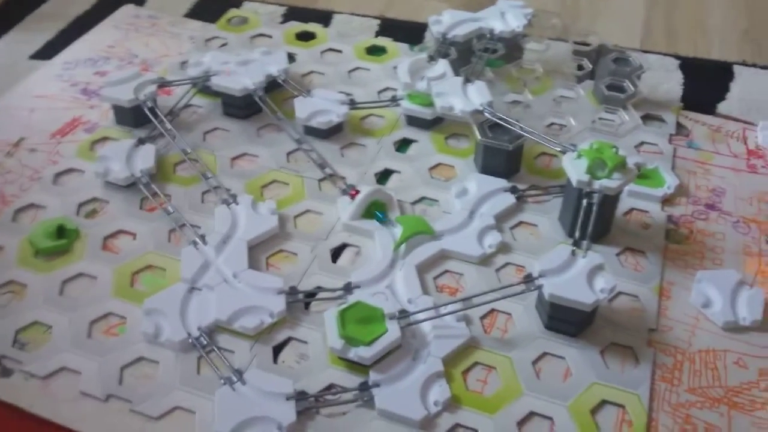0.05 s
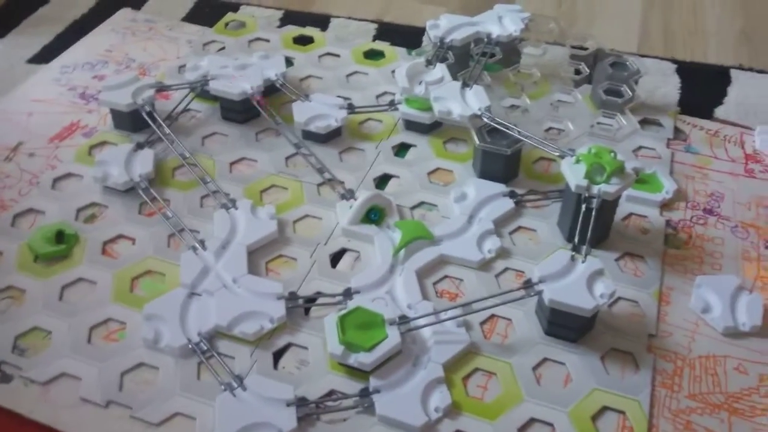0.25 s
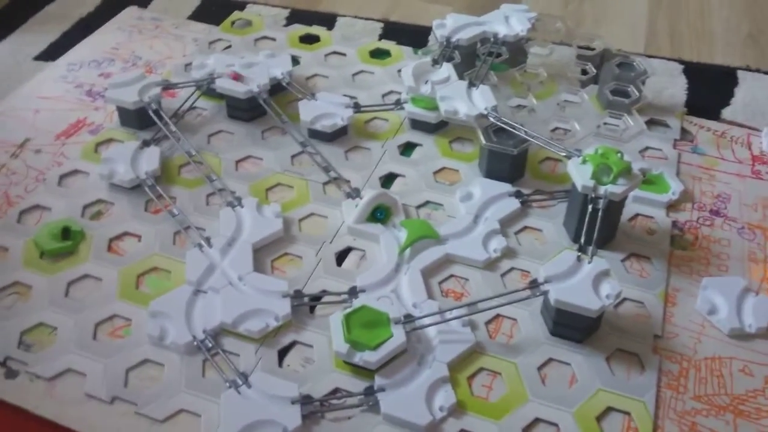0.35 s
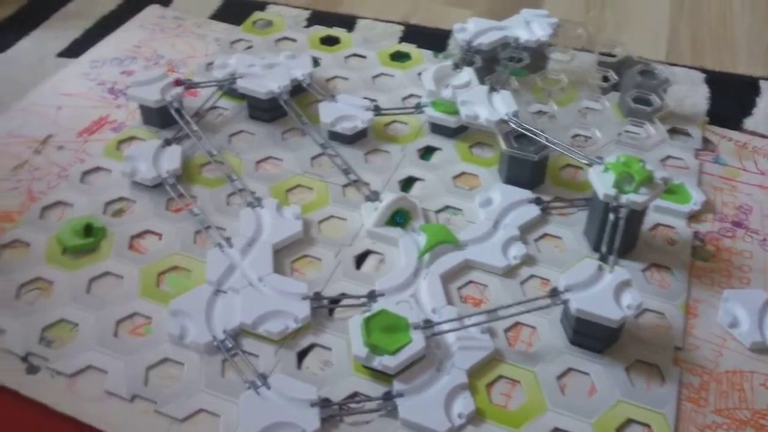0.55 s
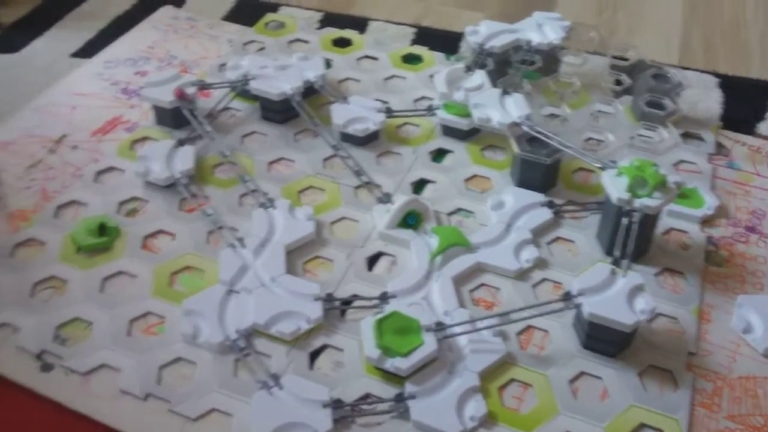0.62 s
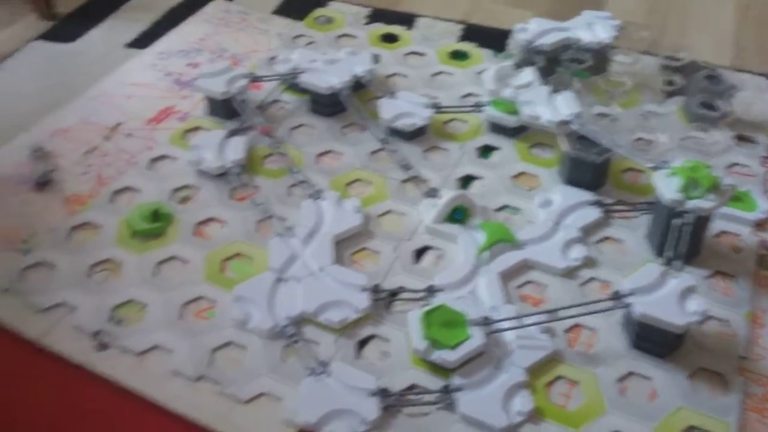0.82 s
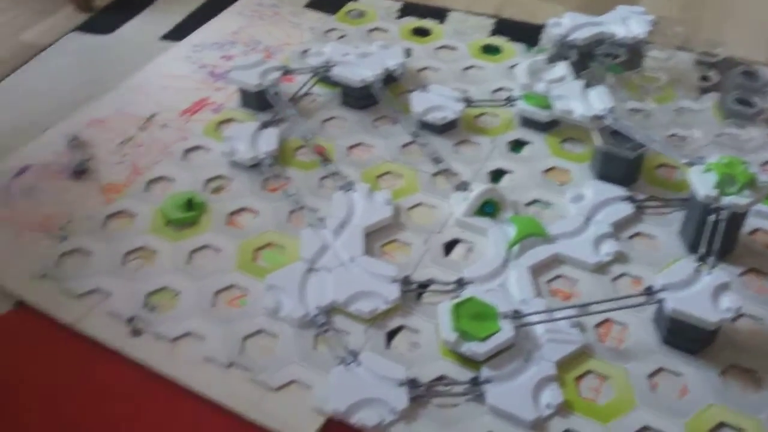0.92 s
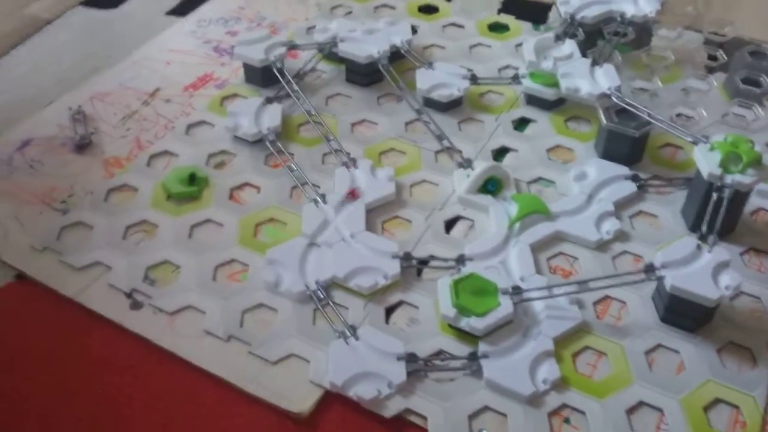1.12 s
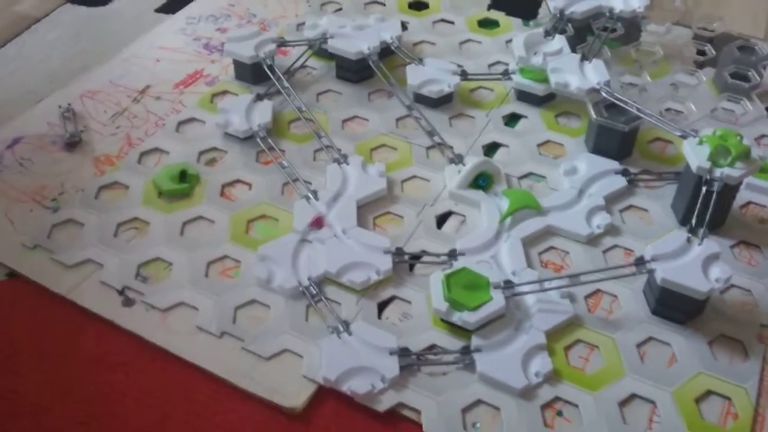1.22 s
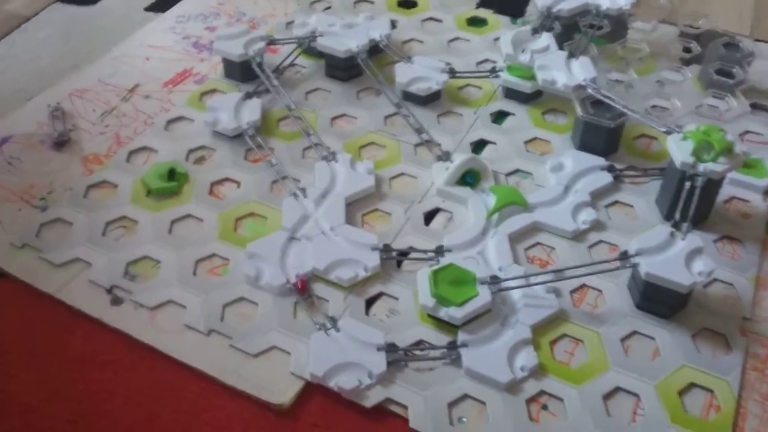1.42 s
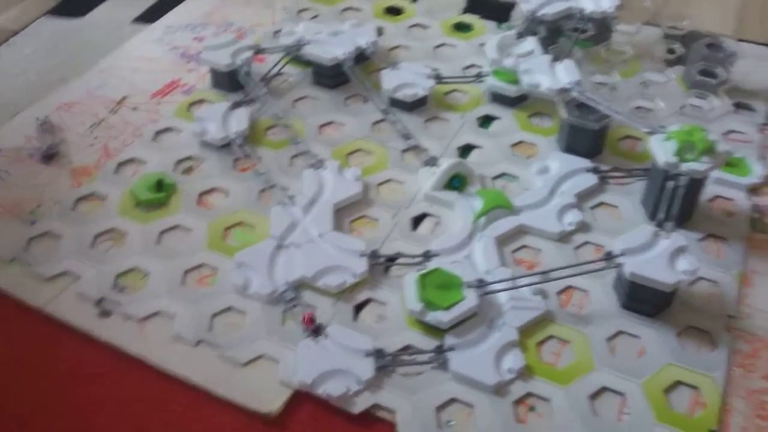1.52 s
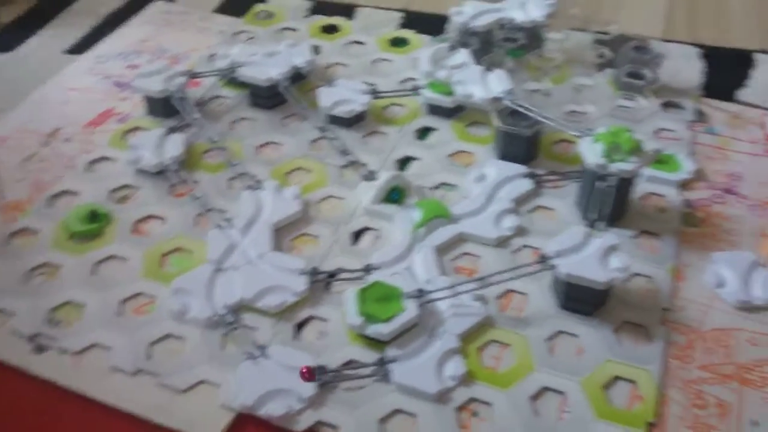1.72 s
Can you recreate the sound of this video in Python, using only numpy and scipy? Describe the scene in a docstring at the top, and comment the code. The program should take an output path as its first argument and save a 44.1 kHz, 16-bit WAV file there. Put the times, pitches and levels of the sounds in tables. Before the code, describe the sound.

Marbles roll along a plastic toy track with a light rumble and small clicks. At about 0.2 seconds two marbles collide with a sharp, bright clack. Irregular clicks and a thin whirr on steel rails continue until 0.9 seconds. After a brief lull, clicking resumes at 1.1 seconds, then quick plastic knocks, loudest near 1.4 seconds, ease off by 1.7. The small room adds a short reverberation and faint steady noise.

```python
"""Marbles on a toy track

Marbles run over plastic tiles and steel rails on a cardboard base, in a small room. Rolling is a train
of tiny impacts, under which the tiles rumble and the rails sing. Larger impacts excite damped vibration:
clicks at the joints, knocks on the walls of curved tiles and, once, the hard clack of two marbles.
The room reverberates after each contact, over a faint steady noise."""
import sys
import numpy as np
from scipy import signal
from scipy.fft import rfft, irfft
from scipy.io import wavfile
from scipy.ndimage import map_coordinates

SR = 44100
rng = np.random.default_rng(int(sys.argv[2]) if len(sys.argv) > 2 else 0)


def dump_mix(stems):
    """Bounce the given channels to the path in sys.argv[1] as a 16-bit WAV at rate SR."""
    frames = np.atleast_2d(stems).T  # one column per channel
    limited = np.clip(frames, -1, 1)  # hard clip at full scale
    pcm = np.round(limited * 32767).astype(np.int16)
    wavfile.write(sys.argv[1], SR, pcm)


N = 77175

# Impacts at joints or walls; each trim adds to the level set below for that part:
# t/s, level/dB, knock trim/dB, rail trim/dB, rail tilt/(dB/octave), snap trim/dB, reverberation/dB
JOINT_IMPACTS = [(0.2134, -23, -38, -7, -25, -23, 9.5), (0.3874, -29, -10, 11, -36, -13.5, 4.5),
                 (0.4186, -24, -6.5, -10.5, -23, -15.5, -5), (0.4298, -29.5, -5, -22, -25, -10.5, 1),
                 (0.4485, -32.5, -7.5, 14.5, -37, -13, 0), (0.526, -28.5, -11.5, -2, -35, -18.5, 0.5),
                 (0.6271, -36, -33, 6.5, -35, -13, 1.5), (0.6774, -27.5, -3, 3, -15, -19, 2.5),
                 (0.7723, -35.5, -18, -3, -19, -16, 2), (0.797, -31.5, -41, 8, 5, -13.5, 3.5),
                 (0.8324, -28.5, -13, 2, 10, -13.5, -6.5), (0.8406, -30.5, -13, 1.5, -1, -11.5, -10.5),
                 (1.0846, -43, -10, 12.5, 3.5, -30, -0.5), (1.1324, -38, -12, 7, -22.5, -7, 0),
                 (1.1392, -30.5, -29, 2, 7, -25, 0), (1.1665, -34, -2.5, 7.5, 2, -10.5, 6.5),
                 (1.1716, -29.5, -6.5, 8.5, -17, -11, 1.5)]
# Impacts on curved tiles: t/s, level/dB, shell trim/dB, edge trim/dB, upper wall resonance f/Hz
WALL_IMPACTS = [(0.017, -33, -22, 0.5, 2540), (0.0844, -27, -10, -1.5, 2560),
                (.125, -26, -12.5, -7.5, 2230), (0.5013, -25, -18, -12, 1890),
                (1.1709, -23.5, -2.5, -3.5, 3700), (1.2784, -19, -8, -11, 3380),
                (1.2961, -22, -6.5, -22, 3500), (1.31, -33, -19, -10, 3550), (1.3636, -24.5, -7, -35, 1880),
                (1.421, -17.5, -7.5, -9.5, 2250), (1.4278, -15, -6.5, -16, 2780),
                (1.4344, -32.5, 7, 6.5, 2680), (1.459, -22, 1, -6.5, 2900), (1.536, -33, 1.5, 2.5, 2900),
                (1.587, -30, -9.5, 0, 3060), (1.6475, -38.5, -2.5, 3.5, 3100),
                (1.712, -32.5, -5, -5.5, 2980)]
# Impacts of marble on marble: t/s, level/dB
MARBLE_IMPACTS = [(0.2189, -17.5), (0.2199, -25)]

# Envelopes of the rolling sounds: t/s, level/dB
RUMBLE_ENVELOPE = [(0, -36.5), (.075, -51), (.1, -43.5), (.185, -46), (.23, -37), (.36, -62), (.43, -65),
                   (.52, -47), (.62, -60.5), (.73, -49.5), (.79, -48), (.92, -70.5), (1.14, -73),
                   (1.22, -44), (1.35, -42.5), (1.41, -53), (1.47, -50), (1.52, -42.5), (1.58, -60.5),
                   (1.68, -57.5), (1.75, -52.5)]
WHIRR_ENVELOPE = [(0, -35), (.07, -72), (.13, -45.5), (.19, -59), (.37, -68), (.44, -38.5), (.51, -55),
                  (.55, -45), (.61, -51), (.66, -42), (.75, -64), (.84, -42), (.93, -67.5), (1.12, -63),
                  (1.22, -63), (1.4, -53.5), (1.5, -47.5), (1.75, -61.5)]
SING_ENVELOPE = [(.3, -72), (.47, -63), (.7, -62), (.83, -56), (.94, -66), (.98, -63), (1, -68),
                 (1.02, -61), (1.12, -64), (1.4, -76)]

# Spectral shapes: f/Hz, level/dB
PLASTIC_SPECTRUM = [(500, -25.5), (1300, -18.5), (2000, 1), (2900, 0), (3700, 1), (4600, 1.5), (5500, 3),
                    (6600, 1.5), (7200, -7), (8000, -16.5), (16000, -49)]
BASE_SPECTRUM = [(40, -40), (75, -14), (130, -6), (200, -6), (295, 3.5), (400, -1), (510, -14), (720, 0),
                 (1000, 2), (2300, -4), (4000, -50)]
SNAP_SPECTRUM = [(4000, -6), (7000, -17), (8500, -15), (9700, -10), (11200, -4.5), (13000, -12),
                 (15500, -11), (17000, -17.5)]
MARBLE_SPECTRUM = [(40, -43.5), (110, -23.5), (260, -2.5), (480, -34), (950, -11), (1700, -1), (2400, -18),
                   (4100, -3), (5400, 5.5), (6900, 7.5), (7800, -8.5), (9500, -4), (11300, -0.5),
                   (13000, 4.5), (15400, 6), (16300, -14.5)]
RUMBLE_SPECTRUM = [(40, -36), (120, -7), (190, -6), (290, 3), (400, -2), (520, -11), (690, -1), (830, -3),
                   (990, 1.5), (1300, -4), (1540, 5), (1690, -2), (1850, 1), (2900, -10), (4600, -17),
                   (6300, -13), (7800, -35), (16000, -46)]
WHIRR_SPECTRUM = [(300, -3), (1300, -7.5), (2000, 9.5), (3600, -1), (5300, 10.5), (6600, 11.5), (7200, -2),
                  (8000, -27), (16000, -27)]
AMBIENT_SPECTRUM = [(20, -10), (45, -22), (75, 5), (130, 5), (500, -5.5), (3000, -5.5), (6500, -14),
                    (8000, -26), (16000, -14.5)]

# Normal modes of the rails and of the ring after a collision: f/Hz, level/dB, T60/s
STEEL_RAIL_MODES = [(1710, 0, .07), (1790, -3, .05), (2050, -5, .028), (3850, 5, .022), (4060, 2, .022),
                    (4980, -1, .02)]
COLLISION_MODES = [(1695, -7, .15), (5380, -7, .13), (6135, -5, .16), (6210, -5, .16), (11280, -9, .11),
                   (12455, -2, .09), (13130, -7, .09), (15225, -2, .085)]
# Resonances of a hollow tile's shell: f/Hz, bandwidth/Hz, level/dB
SHELL_RESONANCES = [(378, 165, -7), (728, 150, 3.5), (1035, 163, 5.5)]
# Reverberation time of the room: f/Hz, T60/s
ROOM_DECAY = [(100, 0.12), (500, 0.38), (2000, 0.25), (6000, 0.29), (10000, 0.21), (16000, 0.21)]

CLICK_T60_S, KNOCK_T60_S, SNAP_T60_S, CLACK_T60_S, WALL_T60_S = 0.044, 0.038, 0.0086, 0.014, 0.016
CLICK_DB, KNOCK_DB, SNAP_DB, RAIL_DB = -9, -7.5, -8.5, -11.5
WALL_DB, EDGE_SNAP_DB, CLACK_RING_DB = -13.5, -31, -10
RAIL_BUILD_S, ROOM_BUILD_S = 0.0015, 0.0024
RESPONSE_SAMPLES = 16384
T = np.arange(RESPONSE_SAMPLES) / SR
FREQS_HZ = np.fft.rfftfreq(RESPONSE_SAMPLES, 1 / SR)


def joint_clicks():
    """Impact excitation: the plastic clicks and snaps, the base knocks and the rails ring briefly."""
    out = np.zeros(N)
    plastic, base, hard = map(minimum_phase, (PLASTIC_SPECTRUM, BASE_SPECTRUM, SNAP_SPECTRUM))
    for start, db, knock_db, rail_db, tilt_db, snap_db, room_db in JOINT_IMPACTS:
        click = amp(CLICK_DB) * burst(plastic, CLICK_T60_S)
        snap = amp(SNAP_DB + snap_db) * burst(hard, SNAP_T60_S)
        knock = amp(KNOCK_DB + knock_db) * burst(base, KNOCK_T60_S)
        rail = amp(RAIL_DB + rail_db) * ring(STEEL_RAIL_MODES, tilt_db)
        rail *= 1 - np.exp(-T / RAIL_BUILD_S)
        impact = in_room(click + snap + knock, room_db) + in_room(rail, room_db=-5)
        add(out, start, amp(db) * impact)
    return out


def wall_knocks():
    """Resonance of hollow tiles: the spot struck sets the wall's pitch; shell thuds, edge clicks."""
    out = np.zeros(N)
    shell = resonances(SHELL_RESONANCES)
    plastic, hard = minimum_phase(PLASTIC_SPECTRUM), minimum_phase(SNAP_SPECTRUM)
    for start, db, shell_db, edge_db, upper_hz in WALL_IMPACTS:
        wall = resonances([(1640, 520, 0), (upper_hz, 600, -3)])
        clack = burst(wall, WALL_T60_S)
        thud = amp(shell_db) * burst(shell, KNOCK_T60_S)
        click = amp(CLICK_DB) * burst(plastic, WALL_T60_S)
        snap = amp(EDGE_SNAP_DB) * burst(hard, SNAP_T60_S)
        impact = amp(WALL_DB) * (clack + thud) + amp(edge_db) * (click + snap)
        add(out, start, amp(db) * in_room(impact, room_db=-3.5))
    return out


def marble_clack():
    """Elastic collision: hard marbles rebound with a very bright crack and a thin metallic ring."""
    out, marble = np.zeros(N), minimum_phase(MARBLE_SPECTRUM)
    for start, db in MARBLE_IMPACTS:
        crack = burst(marble, CLACK_T60_S)
        ringing = amp(CLACK_RING_DB) * ring(COLLISION_MODES)
        add(out, start, amp(db) * in_room(crack + ringing, room_db=1))
    return out


def rolling(spectrum, envelope, gain_db):
    """Forced vibration: the tiny contacts of a rolling marble drive the track's broad response."""
    response = irfft(minimum_phase(spectrum))
    return amp(gain_db) * level(envelope) * contact_train(response)


def rail_singing(gain_db=1, swing_db=3.5):
    """Modal resonance: rolling keeps the rails' modes sounding, at a level that wavers at random."""
    modes = contact_train(ring(STEEL_RAIL_MODES))
    wavering = amp(swing_db * wobble(knots_per_s=35))
    return amp(gain_db) * level(SING_ENVELOPE) * unit(modes * wavering)


def in_room(direct, room_db):
    """Reverberation: a diffuse tail joins the direct sound, builds up and decays band by band."""
    hz, t, bands = signal.stft(rng.standard_normal(RESPONSE_SAMPLES), SR, nperseg=256)
    bands = bands * decay(t, along(ROOM_DECAY, hz)[:, None])
    tail = signal.istft(bands, SR, nperseg=256)[1][:RESPONSE_SAMPLES]
    tail *= 1 - np.exp(-T / ROOM_BUILD_S)
    diffuse = signal.fftconvolve(direct, tail / np.linalg.norm(tail))[:len(direct)]
    return direct + amp(room_db) * diffuse


def ambient_noise(level_db=-66.5):
    """Stationary noise: the room's faint background is white noise shaped by a fixed spectrum."""
    white = rng.standard_normal(N + RESPONSE_SAMPLES)
    response = irfft(minimum_phase(AMBIENT_SPECTRUM))
    return amp(level_db) * unit(signal.fftconvolve(white, response, "valid")[:N])


def contact_train(response, contacts_per_s=800, spread_db=6):
    """Shot noise: impulses of random time, size and sign excite an impulse response and the room."""
    occurs = rng.random(N) < contacts_per_s / SR
    sizes = amp(spread_db * rng.standard_normal(N))
    impulses = occurs * sizes * rng.choice([-1, 1], N)
    vibration = signal.fftconvolve(impulses, response)[:N]
    return unit(in_room(vibration, room_db=0.5))


def burst(response, t60):
    """Modal overlap: the dense, damped modes of a struck part act as filtered, decaying noise."""
    noise = rng.standard_normal(RESPONSE_SAMPLES) * decay(T, t60)
    return unit_blow(irfft(rfft(noise) * response))


def ring(modes, tilt_db_per_octave=0, scatter_db=2):
    """Free vibration: a sum of damped sinusoids, their strengths varying from strike to strike."""
    out = np.zeros(RESPONSE_SAMPLES)
    for hz, db, t60 in modes:
        tilt_db = tilt_db_per_octave * np.log2(hz / modes[0][0])
        gain = amp(db + tilt_db + scatter_db * rng.standard_normal())
        out += gain * decay(T, t60) * np.sin(2 * np.pi * hz * T)
    return unit_blow(out)


def resonances(peaks):
    """Parallel resonators (f/Hz, bandwidth/Hz, level/dB), each response squared for steep skirts."""
    response = 0
    for hz, width_hz, db in peaks:
        damping = 1j * FREQS_HZ * width_hz
        response += amp(db) * (damping / (hz ** 2 - FREQS_HZ ** 2 + damping)) ** 2
    return response


def minimum_phase(spectrum):
    """Causality: folding the cepstrum onto positive time gives a spectrum its minimum phase."""
    cepstrum = irfft(np.log(amp(along(spectrum, FREQS_HZ))))
    cepstrum[1:RESPONSE_SAMPLES // 2] *= 2
    cepstrum[RESPONSE_SAMPLES // 2 + 1:] = 0
    return np.exp(rfft(cepstrum))


def amp(db):
    """Amplitude ratio of a level in decibels."""
    return 10 ** (np.asarray(db) / 20)


def unit(x):
    """Normalisation to rms 1."""
    return x / np.sqrt(np.mean(x ** 2) + 1e-20)


def unit_blow(x, blow_s=0.004):
    """Normalisation to the energy of a short blow of rms 1."""
    return x * np.sqrt(blow_s * SR / (np.sum(x ** 2) + 1e-20))


def decay(t, t60):
    """Exponential damping: 60 dB in t60 seconds."""
    return 1000. ** (-t / t60)


def along(points, hz):
    """Interpolation of (f/Hz, value) points on a logarithmic frequency axis."""
    knots_hz, values = np.transpose(points)
    return np.interp(np.log(hz + 1), np.log(knots_hz + 1), values)


def level(envelope):
    """Gain per sample, interpolated from (t/s, level/dB) points."""
    return amp(np.interp(np.arange(N) / SR, *np.transpose(envelope)))


def wobble(knots_per_s):
    """Smooth random modulation: a spline through Gaussian knots."""
    knots = rng.standard_normal(int(N * knots_per_s / SR) + 4)
    return map_coordinates(knots, [np.arange(N) * knots_per_s / SR])


def add(track, start_s, x):
    """Superposition of x on the track from start_s onward."""
    i = max(round(start_s * SR), 0)
    track[i:i + len(x)] += x[:len(track) - i]


def scene():
    """Linear superposition: the pressures of all sources add in one channel."""
    impacts = joint_clicks() + wall_knocks() + marble_clack()
    tile_rumble = rolling(RUMBLE_SPECTRUM, RUMBLE_ENVELOPE, gain_db=-2)
    rail_whirr = rolling(WHIRR_SPECTRUM, WHIRR_ENVELOPE, gain_db=-2.5)
    return (impacts + tile_rumble + rail_whirr + rail_singing() + ambient_noise())[None]


def record(dry):
    """Band limiting: a steep low-pass filter cuts the sound above 16 kHz."""
    lowpass = signal.butter(24, 16000, fs=SR, output="sos")
    return signal.sosfilt(lowpass, dry)


dry = scene()
out = record(dry)
dump_mix(out)
```